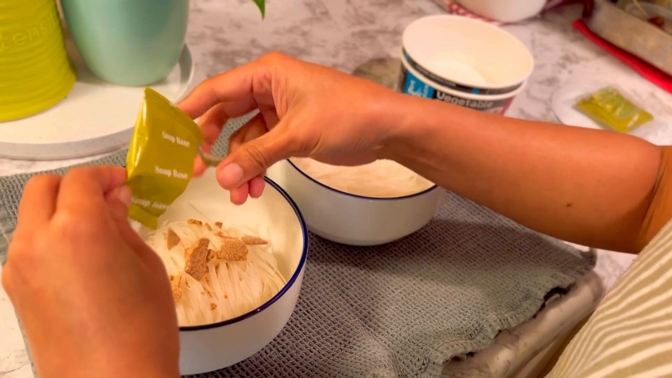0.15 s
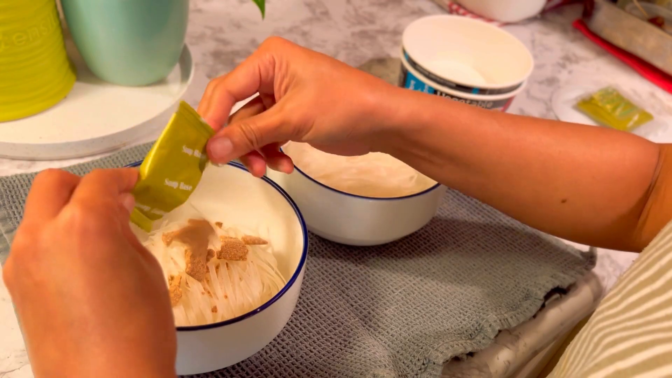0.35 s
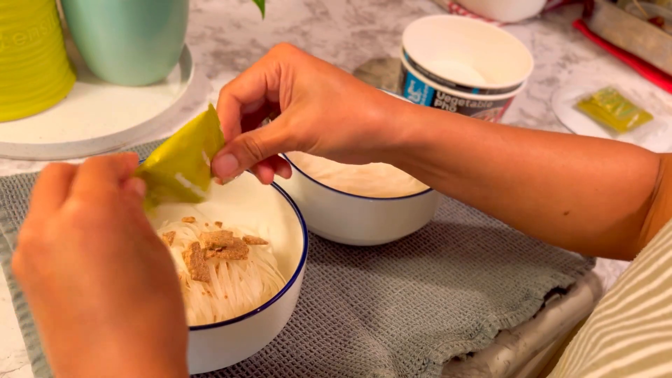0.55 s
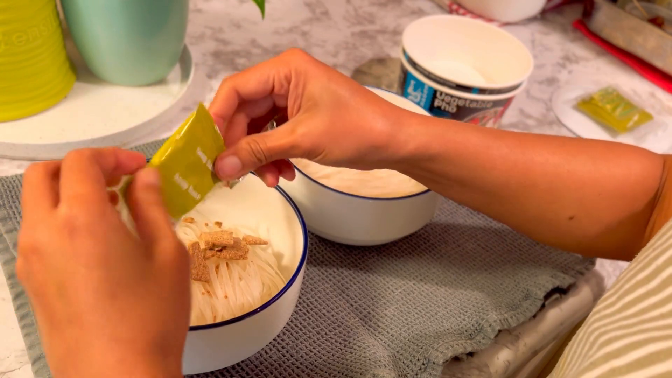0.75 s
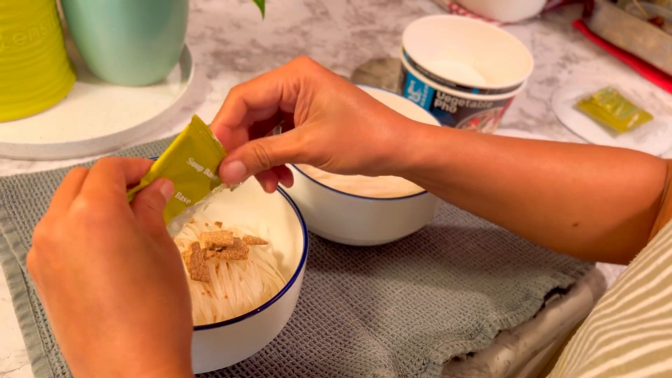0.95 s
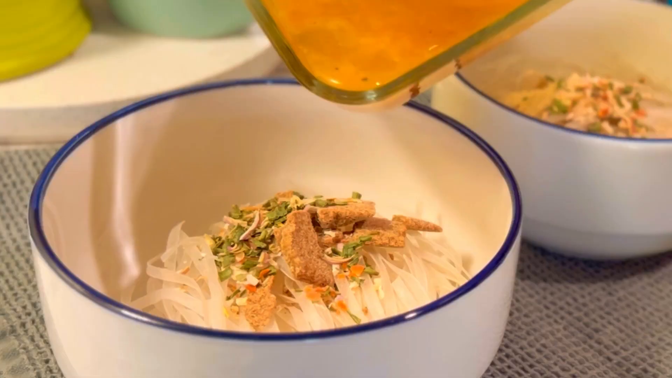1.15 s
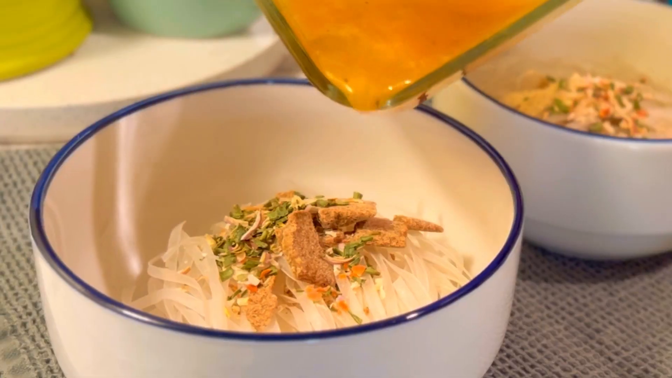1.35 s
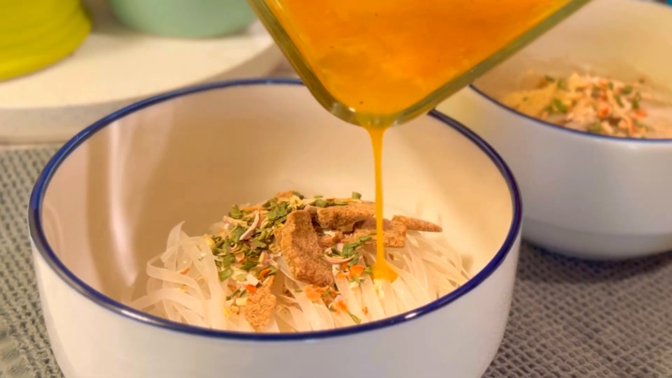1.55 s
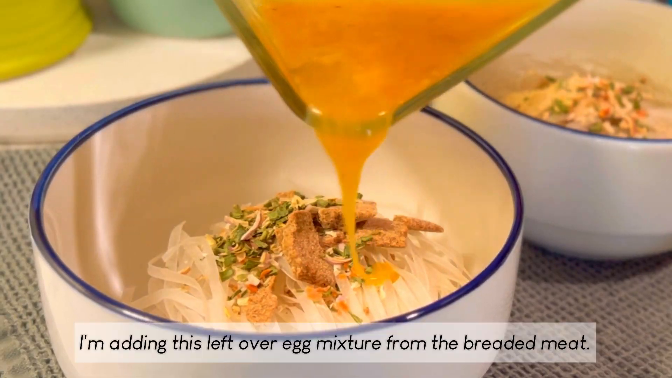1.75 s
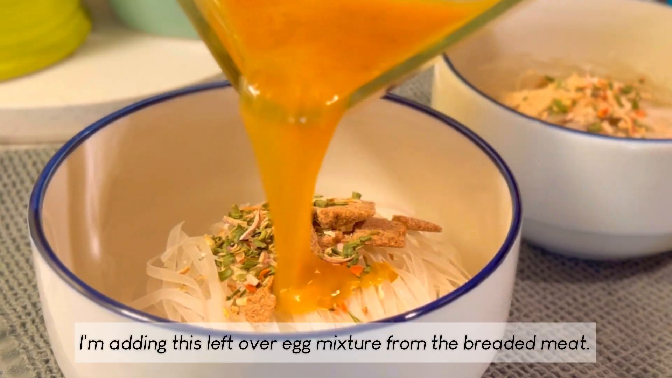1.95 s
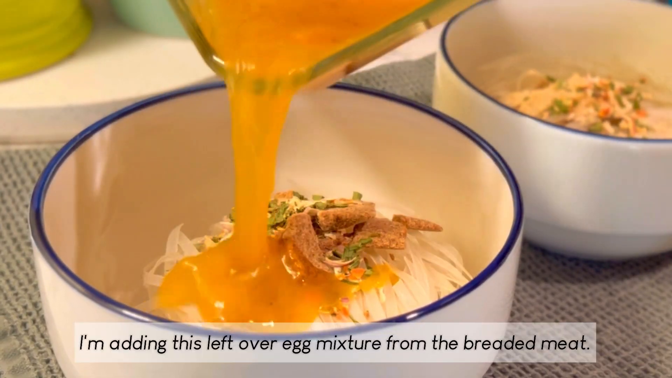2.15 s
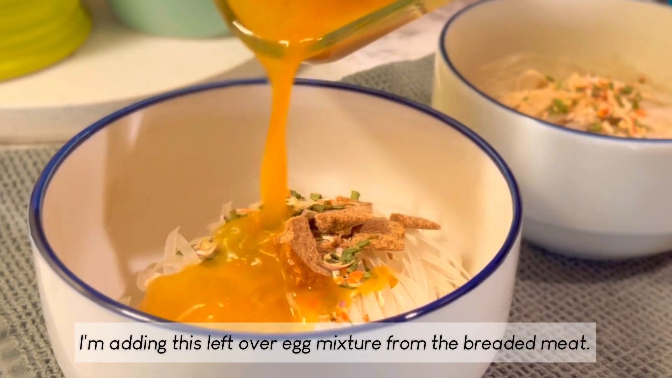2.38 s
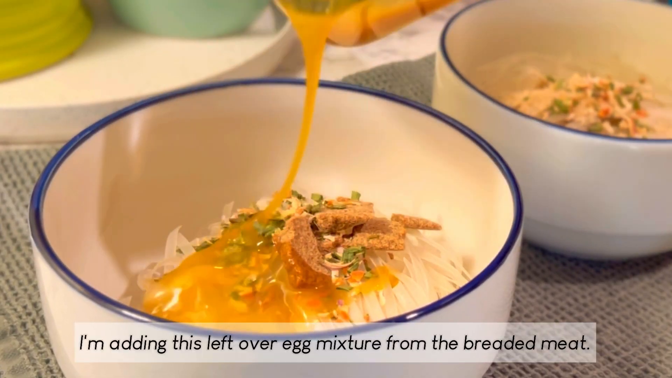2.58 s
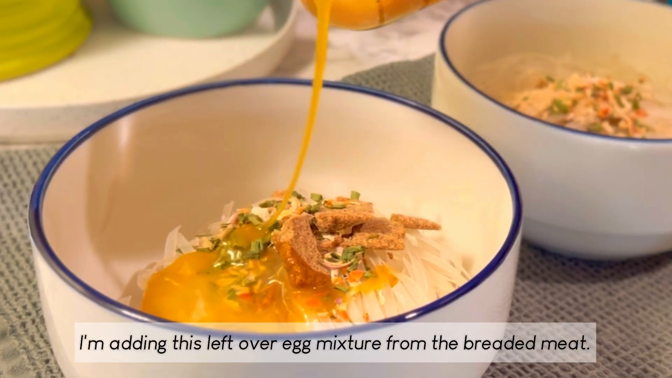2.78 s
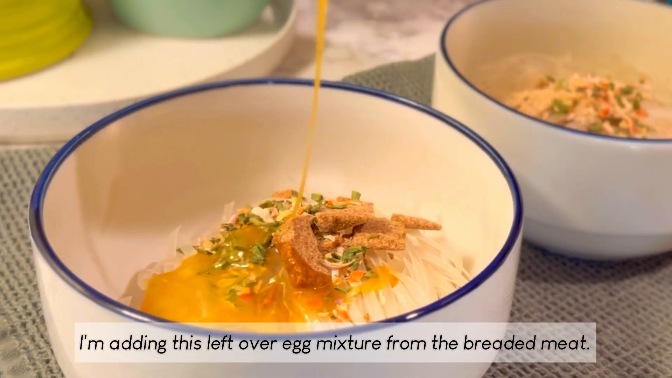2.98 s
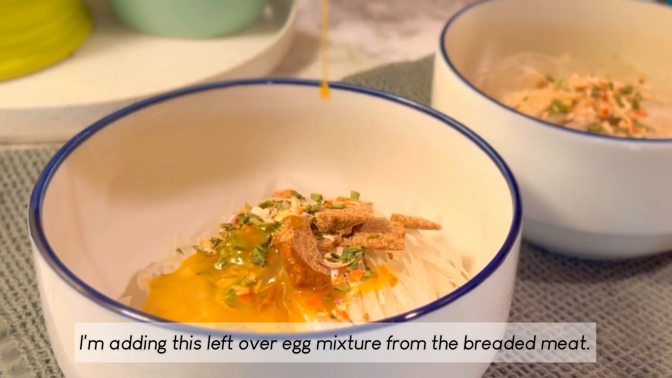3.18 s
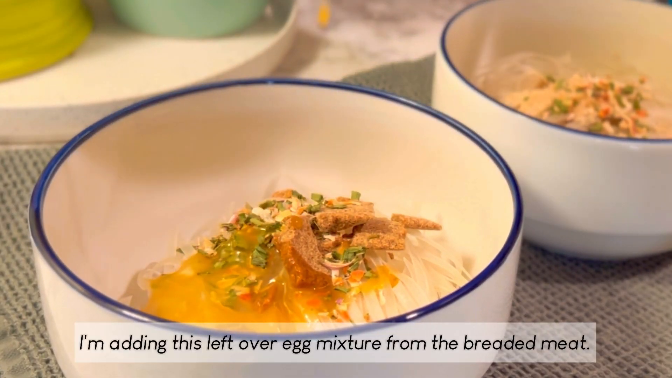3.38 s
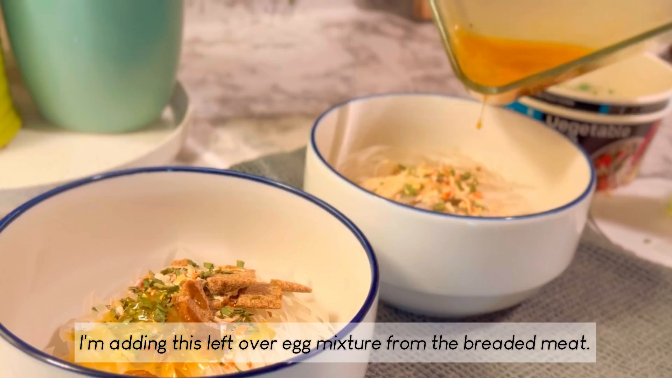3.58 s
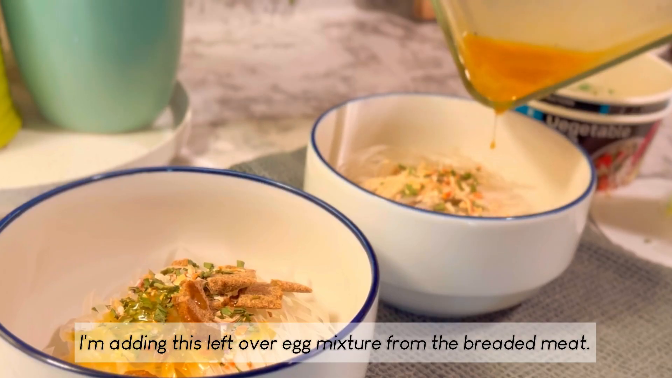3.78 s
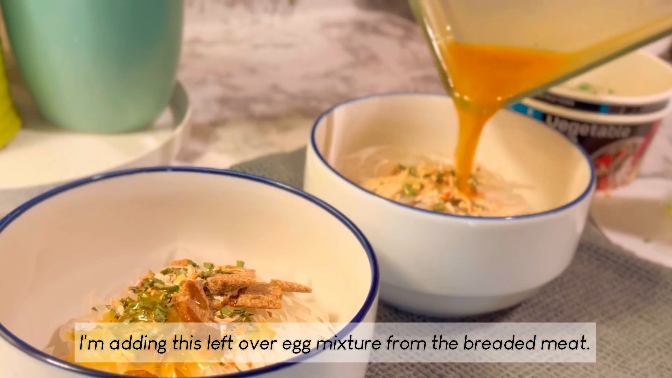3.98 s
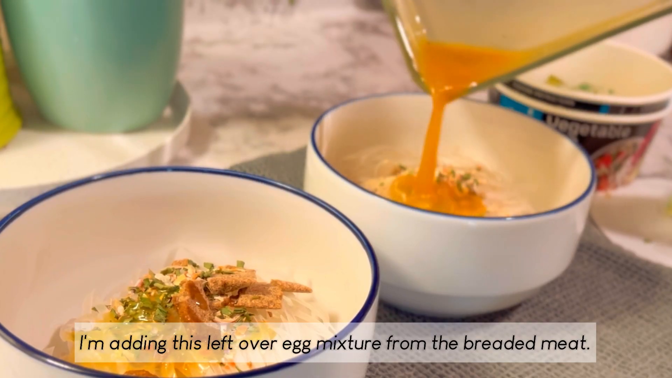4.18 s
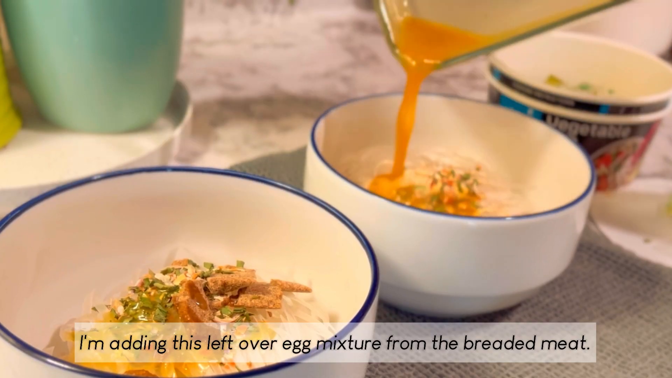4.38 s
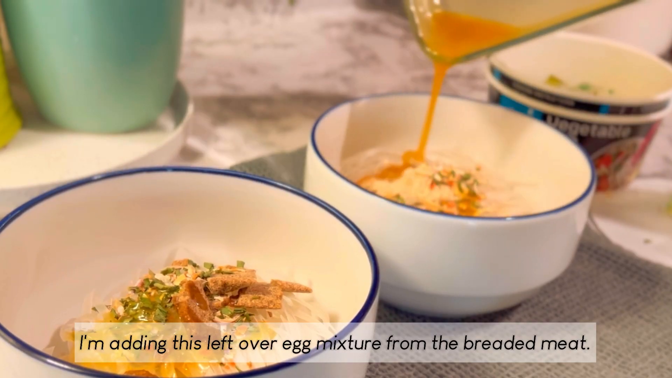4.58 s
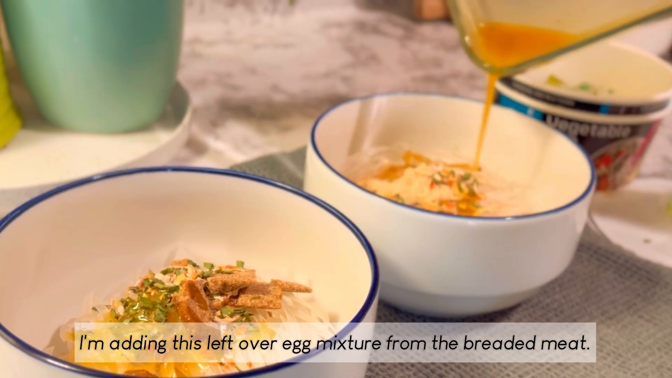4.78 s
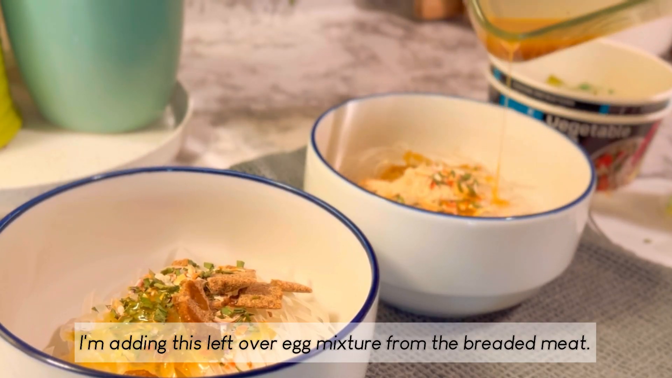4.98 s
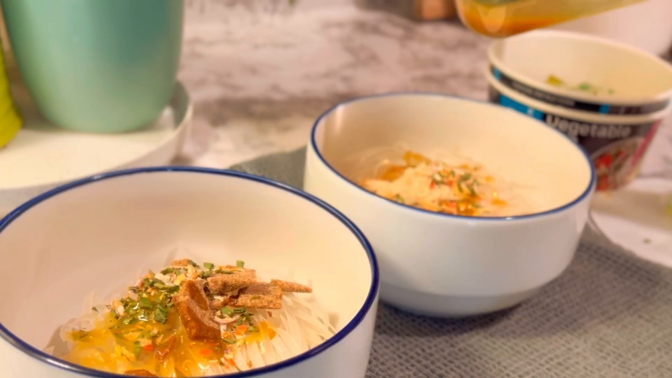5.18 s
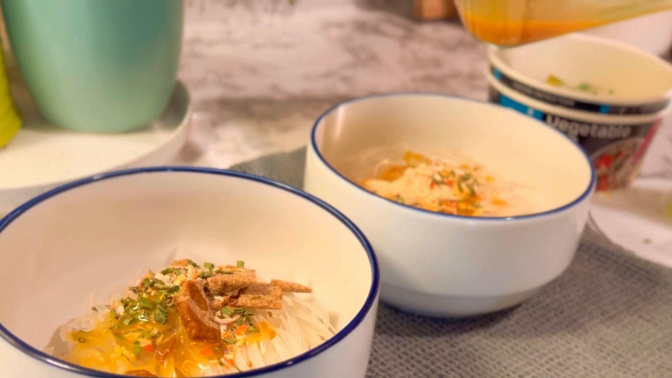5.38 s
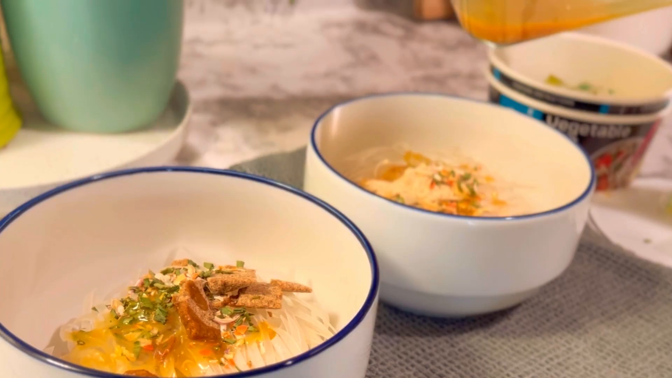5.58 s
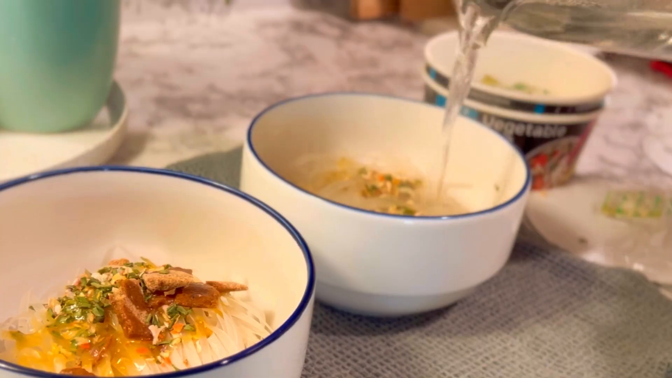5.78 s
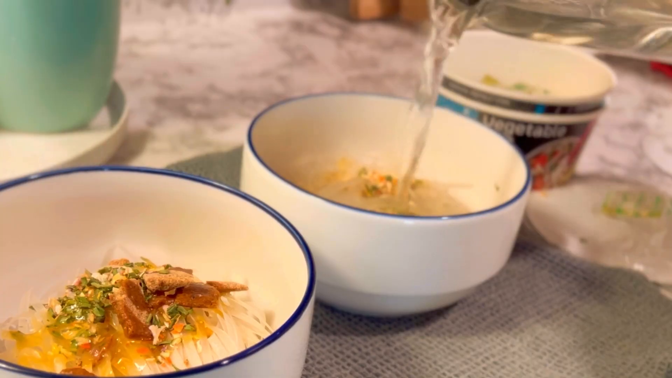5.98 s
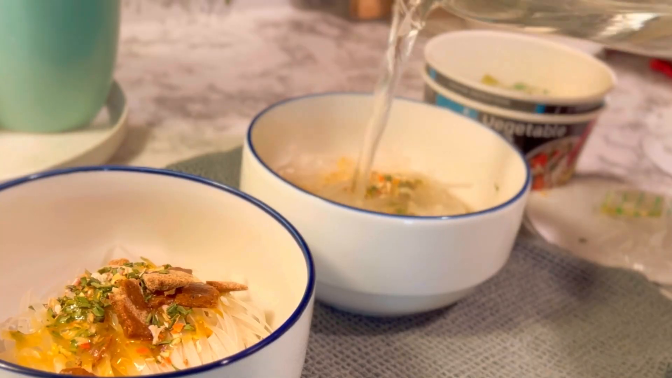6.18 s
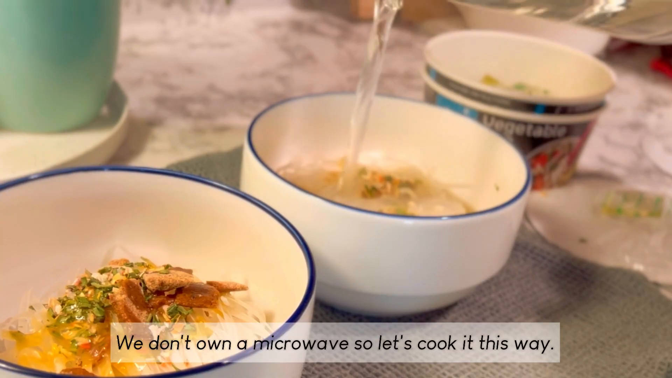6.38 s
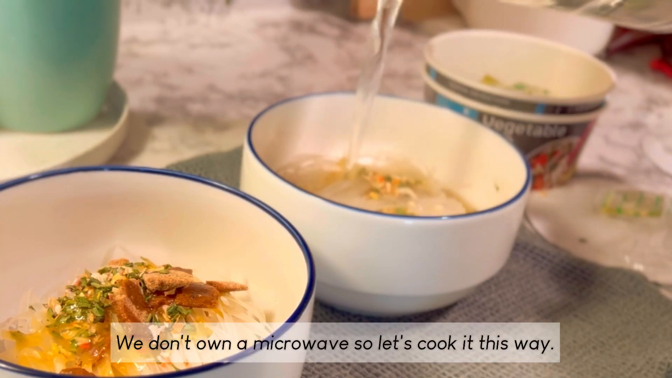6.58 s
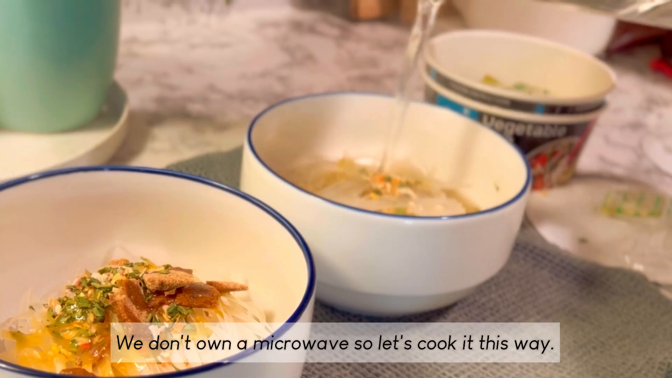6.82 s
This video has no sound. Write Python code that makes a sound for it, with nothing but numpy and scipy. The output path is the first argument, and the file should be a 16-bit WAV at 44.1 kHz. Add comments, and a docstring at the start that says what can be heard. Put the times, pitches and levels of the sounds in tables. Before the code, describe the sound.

From 0 to about 1.2 seconds a small foil sachet is squeezed close to the microphone: dry rustling grains and bright, irregular snaps, densest and loudest around 0.4 to 0.6, with more near 0.76, 0.9 to 1.0 and 1.15. Soft, quickly damped knocks accompany some of them, over the rush and low hum of an extractor fan. At 1.18 the foil is cut off abruptly and the fan becomes quieter, leaving bass rumble and faint sizzling. A dish bumps softly and dully at 2.7; fat ticks near 2.9. At 3.54 the fan and sizzle step up, with a wavering low duct tone and scattered bright spits, most frequent from 4.3 to 5.4. At 5.66 the sizzle rises again and a fluid, fluttering texture of tiny bubbling chirps and fine watery grains continues until the end at roughly 6.9. The kitchen's echo is short.

```python
"""A foil sachet crinkles from the start, in rustling grains and sharp buckles, over a humming extractor fan.
Soft knocks of hands and dishes are damped resonances; a pan sizzles as tiny bursts ring its metal, and fat spits.
The sachet is cut off at 1.18 s, where the second of four sections begins; later a dish bumps softly.
The fan's rush steps at each section; the sizzle steps too and eases twice; rumble and duct tone swell and sink.
In the last section the simmering background grows louder, with a fluid, bubbling flutter of chirps and grains."""
import sys
import numpy as np
from scipy import signal
from scipy.fft import rfft, irfft, next_fast_len
from scipy.io import wavfile
from scipy.ndimage import uniform_filter1d

SR = 44100
rng = np.random.default_rng(int(sys.argv[2]) if len(sys.argv) > 2 else 0)


def master(y):
    """Save y as 16-bit WAV."""
    cut = np.clip(np.atleast_2d(y).T, -1, 1)
    pcm = np.round(cut * 32767)  # scale
    wavfile.write(sys.argv[1], SR, pcm.astype(np.int16))


N = 302078
TIME = np.arange(N) / SR
SIZE = next_fast_len(N + SR // 2)
FREQS = np.arange(SIZE // 2 + 1) * SR / SIZE

# the four sections: start t/s, fan rush level/dB, sizzle drive level/dB, fizz drive level/dB
SECTIONS = [(0, -49.5, -60, -59.5), (1.183, -60.5, -60, -59), (3.539, -51.5, -54, -55),
            (5.663, -51.5, -49.5, -53)]
# colour of the fan's rushing air: f/Hz, relative level/dB
FAN_COLOUR = [(25, -20), (45, -11), (75, 2.5), (100, -12), (150, 4), (200, 1.5), (290, 0.5), (350, -6),
              (410, -9), (450, -0.5), (490, -9), (640, -6.5), (800, -10.5), (1100, -13), (2200, -23.5),
              (3500, -28), (5500, -22.5), (8000, -27), (16000, -35)]
# colour of the noise in the bass rumble: f/Hz, relative level/dB
RUMBLE_COLOUR = [(20, -66), (36, -22), (48, 17.5), (62, -12), (100, 13), (200, -49)]
# bass rumble that comes and goes: t/s, level/dB
RUMBLE_LEVEL = [(0.0, -87), (1.18, -60), (1.85, -55.5), (3.15, -65), (3.66, -56), (5.36, -59), (5.95, -69),
                (6.81, -68), (6.85, -73)]
# motor lines, the two near 119 Hz beating slowly: f/Hz, level/dB against the rush
MOTOR_LINES = [(99, -30), (118.3, -17.5), (119.7, -7.5), (243, -17), (286, -13.5), (888.2, -24)]
LINE_WANDER = 0.00924  # share of its pitch by which a motor line wavers
# swells and sinks of the duct tone, before its throb: t/s, level/dB
DRONE_LEVEL = [(0.0, -48), (0.13, -58), (0.17, -52), (0.82, -48.5), (0.88, -60.5), (1.14, -45.5),
               (1.22, -64), (2.82, -58), (3.51, -65.5), (3.61, -45), (3.81, -54), (4.39, -49), (4.48, -60),
               (4.5, -49), (4.77, -54), (4.94, -47), (5.0, -56.5), (5.27, -45), (5.44, -56), (5.51, -44.5),
               (5.65, -59), (5.69, -45), (5.82, -69), (5.87, -46.5), (6.14, -56.5), (6.56, -50.5),
               (6.6, -64), (6.85, -51.5)]
DRONE_HZ, THROB_DB, THROBS_PER_S = 167.9, 2.5, 18  # the throb is random

# resonances of the pan: f/Hz, width/Hz, relative level/dB
PAN_MODES = [(1461, 45, 3.5), (2148, 80, 3), (2526, 34, -2), (2800, 76, -0.5), (3333, 42, -0.5),
             (3553, 60, -3.5), (4256, 77, -2), (4650, 52, -5.5), (4917, 25, 3), (5270, 68, -0.5),
             (5610, 81, 4.5), (6325, 300, -2.5), (6860, 97, 5), (7300, 180, 0.5), (8100, 270, -1),
             (8670, 136, -1), (9220, 230, -8)]
PAN_WAVER_DB, PAN_WAVERS_PER_S = 1.5, 50
# filter for the fizz above the pan: f/Hz, gain level/dB
FIZZ_COLOUR = [(1000, -0.5), (4000, -34), (7000, -32), (9200, -9.5), (11000, 3), (13000, -15.5),
               (16000, -15)]
# the frying eases and stays lower until the next section: t/s, level change/dB
LULLS = [(2.9, -1), (5.15, -2)]
LULL_FALL_S = 0.043

# squeezes and shakes of the sachet: middle t/s, half length/s, rustle level/dB
SQUEEZES = [(0.116, 0.0045, -37), (0.262, 0.068, -43), (0.324, 0.013, -36.5), (0.452, 0.014, -33.5),
            (0.499, 0.021, -38), (0.58, 0.025, -40.5), (0.895, 0.0051, -63), (0.984, 0.035, -46.5),
            (1.116, 0.047, -49)]
HOLDING_DB = -52.5  # rustle of the sachet merely held
# colour of the rustling foil: f/Hz, relative level/dB
FOIL_COLOUR = [(250, -16), (550, 4.5), (1200, 0), (1900, 2), (4400, 5.5), (7000, 5), (10000, 0.5),
               (13000, 3), (16000, -10)]
# loud buckles: t/s, crack and tick level/dB, tick against crack level/dB, crack f/Hz, decay/ms,
# relative half width of the crack
BUCKLES = [(.0483, -40, 8, 6490, 2.1, 0.9), (.108, -38, -4, 4500, 1.2, 0.77),
           (.1485, -47, -3, 6200, .5, 0.32), (.1828, -32, -2, 5270, 0.62, 0.58),
           (.2572, -42, -5, 5500, .4, .4), (.2805, -42, -11, 7300, .4, 0.21),
           (.311, -39, -11, 6200, 2, .25), (.324, -27.5, 3.5, 6360, 4.7, 0.21),
           (.3945, -35.5, -27, 3700, 0.3, .3), (.4077, -29.5, -23, 6760, 0.21, .9),
           (.4318, -23, 9, 6850, 1.8, 0.59), (.4451, -19, -16, 4300, 0.9, 0.77),
           (.447, -41, -9, 7000, 0.7, 0.34), (.4509, -44, 2, 5660, 0.67, .6),
           (.454, -35, -12, 3680, 3, 0.31), (.4638, -20.5, 3.5, 9050, 1.6, .5),
           (.4905, -20, 19, 4300, 1.1, 0.66), (.4928, -24.5, -12, 3150, 2.9, 0.24),
           (.4983, -40, -14, 4300, .8, 0.81), (.502, -33, -16, 2900, 3.8, 0.2),
           (.5116, -37, -6, 4000, .45, 0.67), (.5208, -21, 4.5, 4640, .95, 0.1),
           (.5462, -25.5, 11, 5600, .55, 0.29), (.5874, -38, -14, 4200, 0.82, 0.45),
           (.5945, -37, -14, 4300, 0.54, 0.47), (.6304, -41, -13, 4670, .41, 0.68),
           (.6388, -38.5, -19, 3620, .7, 1.2), (.6496, -33.5, -9, 4900, 0.62, 0.91),
           (.7593, -23, 7.5, 4800, 0.24, .65), (.8855, -37.5, -19, 3570, 1.9, 0.73),
           (.889, -42, -18, 4230, 0.49, 0.46), (.8985, -45, -22, 3900, .35, .4),
           (.9113, -35, -12, 5950, 0.52, .4), (.9162, -27, 9, 4860, 1, 1.2),
           (.9203, -40, -9, 4960, .5, 0.54), (.9398, -48, -10, 5040, .5, .5),
           (.9525, -39.5, -8, 4420, 1.1, 0.8), (.9702, -39, 13, 6380, 0.41, .4),
           (.9878, -25, 7, 6600, 1.2, 0.13), (1.011, -43, -4, 4500, .4, .5),
           (1.0438, -39.5, -6, 5200, 0.93, .25), (1.0625, -41, 3, 6400, 1.4, 0.31),
           (1.0942, -40.5, 2, 4500, .96, .15), (1.1292, -26, 5, 4560, 0.74, 0.79),
           (1.1533, -21, 5.5, 5530, 1.46, 0.59)]
SNAP_RISE_SHARE = .3  # a buckle's rise, as a share of its decay
PANEL_DB, PANEL_DECAY_S = -44, 0.0048  # the panel's low ring at an average buckle
PANEL_FOLLOWS = 0.57  # power of the crack's swing that the panel follows
FACET_RING_DB, FACET_DECAY_S = 0, 0.00037  # the facet's clean ring, against its crack

# fat spitting in the pan: t/s, drive level/dB, pan ring drive against tick drive level/dB
SPITS = [(2.8968, -31.5, -3.5), (3.1025, -49, 11), (3.5399, -41, 6.5), (3.9625, -35.5, 8),
         (4.2816, -34, -4), (4.337, -31, -2), (4.4841, -33.5, 1), (4.5914, -35, 1), (4.6155, -34, 7),
         (4.869, -30, -7), (4.909, -31.5, 0.5), (5.1022, -30.5, -0.5), (5.1657, -42.5, 11.5),
         (5.3714, -29, -1), (5.4165, -33.5, 0), (6.5425, -40, 9)]
CHANCE_SPIT_DB, CHANCE_SPREAD_DB = 21, 5  # drive of further, chance spits against the fizz drive

# soft knocks of hands and dishes: t/s, drive level/dB, f/Hz, t60/s
KNOCKS = [(0.581, -29.5, 570, 0.045), (0.599, -29, 524, 0.022), (.601, -29.5, 780, 0.021),
          (.759, -23.5, 610, 0.01), (0.888, -28, 600, 0.0084), (0.911, -25.5, 1090, 0.0045),
          (1.129, -25, 516, 0.027), (1.129, -36, 1400, 0.0079), (1.155, -30, 434, 0.019)]
# modes of the bumped dish: f/Hz, relative level/dB, t60/s
DISH_MODES = [(290, 1, 0.06), (450, -17, .035), (900, -16, 0.032), (1400, -13, .035)]
BUMP_S, BUMP_DB = 2.699, -35

# colour of the dense flutter in the last section: f/Hz, relative level/dB
FLUTTER_COLOUR = [(300, -20), (700, -14), (1400, 2), (2400, -32), (3300, -2.5), (6000, 6), (12000, -13)]
FLUTTER_PATCH_DB = 2  # each half octave of the flutter swells and sinks on its own
# narrow resonances within the flutter: f/Hz, width/Hz, relative level/dB
NARROW_MODES = [(2223, 45, -5.5), (2522, 40, -3)]

# likeness of left and right for the near sounds: f/Hz, likeness (held to 0-1 in use)
NEAR_LIKENESS = [(200, -1.25), (1000, 0.66), (2500, 0.3), (4200, 0.33), (5300, 0), (7000, 0.5), (8500, 0.3),
                 (9800, 2.3), (16000, 2.5)]
# likeness of left and right for the fan and stove: f/Hz, likeness (0-1)
FAR_LIKENESS = [(50, 0.61), (150, 0.89), (300, 0.96), (450, 0.79), (1000, 0.56), (2200, 0.8), (3300, 0.14),
                (5500, 0.027), (7500, 0.14), (9500, 1), (12000, 1)]
# stereo lean of the near sounds: f/Hz, left-right level/dB
NEAR_BALANCE = [(300, -3.5), (1300, 3.5), (4500, 3), (7000, 3.5), (9500, 0)]
# stereo lean of the fan and stove: f/Hz, left-right level/dB
FAR_BALANCE = [(200, 1), (380, -3.5), (1290, 5.5), (2400, -1.5), (4400, 7), (6200, 10.5), (6900, 13),
               (8600, 0), (10000, -0.5)]
# the right microphone lags in the lows and leads in the top octave; the phase holds still in between
LOW_LAG_S, LAG_TO_HZ, HIGH_LEAD_S, LEAD_FROM_HZ = .00047, 4350, .00029, 8400
KITCHEN_T60, CUTOFF_HZ = .35, 16300  # s, Hz


def from_db(db):
    """Decibels to gain."""
    return 10 ** (np.asarray(db) / 20)


def rms_one(x):
    """Scale to unit rms."""
    return x / np.sqrt(np.mean(x ** 2) + 1e-20)


def over_hz(points):
    """Join a table by straight lines on a log-frequency axis."""
    hz, value = np.transpose(points)
    return np.interp(np.log(FREQS + 1), np.log(hz), value)


def colour(x, spectrum):
    """Filter a signal with a smooth spectrum."""
    return irfft(rfft(x, SIZE) * from_db(over_hz(spectrum)), SIZE)[..., :N]


def band(x, low_hz, high_hz):
    """Causal band-pass."""
    edges = [low_hz, min(high_hz, SR * .45)]
    return signal.sosfilt(signal.butter(2, edges, "band", fs=SR, output="sos"), x)


def resonance(x, hz, width_hz):
    """One resonance with gain 1 on top."""
    return signal.lfilter(*signal.iirpeak(hz, hz / width_hz, fs=SR), x + 1e-18)


def drift(rate):
    """A random wander through `rate` knots a second, the knots having spread 1."""
    knots = rng.standard_normal(int(N / SR * 200) + 2)
    return np.interp(TIME * rate, np.arange(len(knots)), knots)


def tone(hz, wander_hz):
    """A sine of unit rms whose pitch wanders."""
    cycles = np.cumsum(hz + wander_hz * drift(20)) / SR
    return np.sqrt(2) * np.sin(2 * np.pi * (cycles + rng.random()))


def grains(per_s, spread_db):
    """Random tiny clicks of uneven size, in two unrelated channels."""
    born = rng.random((2, N)) < per_s / SR
    size = rng.standard_normal((2, N))
    boost_db = spread_db * np.minimum(rng.exponential(1, (2, N)), 4)
    return rms_one(born * size * from_db(boost_db))


def microphones(pair, likeness, balance):
    """Two channels become left and right: partly alike, uneven in level and in arrival time."""
    common, apart = rfft(pair, SIZE)
    alike = np.clip(over_hz(likeness), 0, 1)
    sides = np.sqrt((1 + alike) / 2) * common + np.sqrt((1 - alike) / 2) * apart * [[1], [-1]]
    lean = from_db(over_hz(balance) * [[.5], [-.5]])
    sides = sides * lean / np.sqrt(np.mean(lean ** 2, axis=0))
    lag_turns = LOW_LAG_S * np.minimum(FREQS, LAG_TO_HZ)
    lead_turns = HIGH_LEAD_S * np.maximum(FREQS - LEAD_FROM_HZ, 0)
    sides[1] *= np.exp(-2j * np.pi * (lag_turns - lead_turns))
    return irfft(sides, SIZE)[:, :N]


def reflections(pair, early_db, early_t60, late_db, late_t60):
    """Quick bright echoes from close by, then the kitchen's short, duller tail."""
    t = TIME[:SR // 2]
    early, late = rng.standard_normal((2, 2, len(t))) * (t > .001)
    early = band(early, 140, 13700) * from_db(-60 * t / early_t60)
    late = band(late, 120, 3600) * from_db(-60 * t / late_t60)
    echo = from_db(early_db) * rms_one(early) + from_db(late_db) * rms_one(late)
    return pair + signal.fftconvolve(pair, echo / np.sqrt(len(t)), axes=1)[:, :N]


def fan(fan_db):
    """Rushing air as coloured noise, a bass rumble, wavering motor lines and the throbbing duct tone."""
    rush = from_db(fan_db) * rms_one(colour(rng.standard_normal((2, N)), FAN_COLOUR))
    rumble = rms_one(colour(rng.standard_normal(N), RUMBLE_COLOUR))
    rumble = rms_one(rumble + tone(49, wander_hz=3.4))
    rumble = from_db(np.interp(TIME, *np.transpose(RUMBLE_LEVEL))) * rumble
    lines = 0
    for hz, db in MOTOR_LINES:
        lines = lines + from_db(fan_db + db + 2.06 * drift(11)) * tone(hz, wander_hz=LINE_WANDER * hz)
    throb_db = THROB_DB * np.minimum(drift(THROBS_PER_S), 1)
    drone_db = np.interp(TIME, *np.transpose(DRONE_LEVEL)) + throb_db
    drone = from_db(drone_db) * tone(DRONE_HZ, wander_hz=2.37)
    return microphones(rush, FAR_LIKENESS, FAR_BALANCE) + rumble + lines + drone


def pan_ring(x):
    """The pan's resonances in parallel, each wavering in strength, keeping the power of white noise."""
    click, ring, out = signal.unit_impulse(SR // 10), 0, 0
    for k, (hz, width, db) in enumerate(PAN_MODES):
        gain = (-1) ** k * from_db(db)
        waver = from_db(PAN_WAVER_DB * drift(PAN_WAVERS_PER_S))
        ring = ring + gain * resonance(click, hz, width)
        out = out + gain * waver * resonance(x, hz, width)
    return out / np.linalg.norm(ring)


def sizzle(sizzle_db, fizz_db, per_s, spread_db, flutter_db):
    """Tiny steam bursts ring the pan and fizz above it."""
    bursts = grains(per_s, spread_db) * from_db(flutter_db * drift(60))
    return pan_ring(from_db(sizzle_db) * bursts) + colour(from_db(fizz_db) * bursts, FIZZ_COLOUR)


def squeezing():
    """Strength of the rustle: every squeeze swells and fades smoothly above that of the held sachet."""
    power = from_db(HOLDING_DB) ** 2
    for s, half_s, level_db in SQUEEZES:
        power = power + from_db(level_db) ** 2 * np.exp(-((TIME - s) / half_s) ** 2)
    return np.sqrt(power)


def rustle(effort, per_s, spread_db, creases_db, creases_per_s):
    """Countless sliding grains under the fingers, and a sparser crackle of tiny creases."""
    foil = grains(per_s, spread_db) + from_db(creases_db) * grains(creases_per_s, spread_db)
    return effort * rms_one(colour(foil, FOIL_COLOUR))


def push(t, decay_s):
    """Envelope of a buckle: a quick rise, then an exponential fall."""
    return (1 - np.exp(-t / (SNAP_RISE_SHARE * decay_s))) * np.exp(-t / decay_s)


def unit_burst(x):
    """Scale to the energy of 3 ms at unit rms."""
    return x / np.sqrt(np.sum(x ** 2, axis=-1, keepdims=True) / (.003 * SR))


def snaps():
    """In each buckle the crease ticks, the facet beside it cracks and rings, and the whole panel rings low."""
    out, t = np.zeros((2, N)), TIME[:SR // 30]
    average_db = np.mean(BUCKLES, axis=0)[1]
    for s, level_db, tick_db, hz, decay_ms, width in BUCKLES:
        at, snap_s, spread = int(s * SR), decay_ms / 1000, 1 + max(width, .05)
        crack = from_db(level_db) / np.hypot(1, from_db(tick_db))
        tick = crack * from_db(tick_db)
        panel = from_db(PANEL_DB) * (crack / from_db(average_db)) ** PANEL_FOLLOWS
        parts = [(panel, 340, 950, PANEL_DECAY_S),
                 (crack, hz / spread, hz * spread, snap_s),
                 (tick, 5800, 17000, snap_s)]
        for gain, low, high, decay_s in parts:
            noise = rng.choice([-1, 1], (2, len(t))) * push(t, decay_s)
            out[:, at:at + len(t)] += gain * unit_burst(band(noise, low, high))
        ring = unit_burst(np.sin(2 * np.pi * hz * t) * push(t, FACET_DECAY_S))
        out[0, at:at + len(t)] += crack * from_db(FACET_RING_DB) * ring
    return out


def spits(fizz_db, count, tick_db, ring_db):
    """Fat pops with a sharp bright tick, some ringing the pan more; further spits of like strength fall by chance."""
    chance = []
    for when, size in rng.random((count, 2)):
        drive_db = fizz_db[int(when * N)] + CHANCE_SPIT_DB - CHANCE_SPREAD_DB * size
        chance.append((when * N / SR, drive_db, 0))
    ticks, blows = np.zeros((2, 2, N))
    for s, drive_db, pan_db in list(SPITS) + chance:
        at, pop = int(s * SR), from_db(drive_db) * np.array([1, rng.choice([-1, 1])])
        ticks[:, at] += pop
        blows[:, at] += from_db(pan_db) * pop
    bright = from_db(tick_db) * band(ticks + 1e-18, 4600, 12000)
    pops = bright + from_db(ring_db) * pan_ring(band(blows + 1e-18, 830, 7000))
    pops[1] = np.roll(pops[1], SR // 2000)  # second channel half a millisecond late
    return reflections(pops, early_db=-6, early_t60=.06, late_db=-12, late_t60=KITCHEN_T60)


def knocks(rise_s, tap_db, tap_decay_s):
    """Each soft knock starts with a faint dull tap and swells into one quickly damped resonance."""
    out, t = np.zeros(N), TIME[:SR // 4]
    for s, level_db, hz, t60 in KNOCKS:
        at = int(s * SR)
        ring = (1 - np.exp(-t / rise_s)) * from_db(-60 * t / t60) * np.sin(2 * np.pi * hz * t)
        tap = np.exp(-t / tap_decay_s) * rms_one(band(rng.standard_normal(len(t)), 270, 2900))
        out[at:at + len(t)] += from_db(level_db) * (ring + from_db(tap_db) * tap)
    return out


def bump(rise_s):
    """A padded contact swells into the dish's few damped modes."""
    t, modes = np.maximum(TIME - BUMP_S, 0), 0
    for hz, db, t60 in DISH_MODES:
        modes = modes + from_db(np.maximum(db - 60 * t / t60, -200)) * np.sin(2 * np.pi * hz * t)
    return from_db(BUMP_DB) * (1 - np.exp(-t / rise_s)) * modes


def bubbling(level_db, count, cycles, low_hz, high_hz, spread_db, rise_per_s):
    """Small soft bubbles in the last section: damped sines, each rising a little in pitch."""
    out, t, start = np.zeros(N + SR), TIME[:SR // 25], SECTIONS[-1][0]
    for when, pitch, size in rng.random((count, 3)):
        hz = low_hz * (high_hz / low_hz) ** pitch
        at = int(start * SR + when * (N - start * SR))
        bubble = np.exp(-t * hz / cycles) * np.sin(2 * np.pi * hz * t * (1 + rise_per_s * t))
        out[at:at + len(t)] += from_db(level_db - spread_db * size) * bubble
    return out[:N]


def fluid_flutter(level_db, per_s, spread_db, surges_per_s, narrow_db, narrow_surge_db):
    """Dense fine grains shift in colour, with narrow resonances near 2.2 and 2.5 kHz surging unevenly."""
    fine = grains(per_s, spread_db)
    coloured, edges = colour(fine, FLUTTER_COLOUR), np.geomspace(400, 16000, num=11)
    flutter, narrow = 0, 0
    for low, high in zip(edges, edges[1:]):
        patch = from_db(FLUTTER_PATCH_DB * drift(surges_per_s))
        flutter = flutter + patch * band(coloured, low, high)
    for hz, width, db in NARROW_MODES:
        surge = from_db(db + narrow_surge_db * drift(surges_per_s))
        narrow = narrow + surge * rms_one(resonance(fine, hz, width))
    return from_db(level_db) * rms_one(flutter) + from_db(narrow_db) * narrow


def scene():
    """The sachet in the first section and the bubbling flutter in the last, over the kitchen background."""
    starts, *levels = np.transpose(SECTIONS)
    section = np.maximum(np.searchsorted(starts, TIME, side="right") - 1, 0)
    fan_db, sizzle_db, fizz_db = [uniform_filter1d(level[section], size=300) for level in levels]
    lull_db = 0
    for s, db in LULLS:
        same_section = section == section[int(s * SR)]
        lull_db = lull_db + db * np.clip((TIME - s) / LULL_FALL_S, 0, 1) * same_section

    foil = snaps() + rustle(squeezing(), per_s=7000, spread_db=2.0, creases_db=-2.5, creases_per_s=200)
    foil = reflections(foil, early_db=-9, early_t60=.06, late_db=-16, late_t60=KITCHEN_T60)
    sachet = foil * uniform_filter1d(1. * (section == 0), size=300)

    simmer = bubbling(level_db=-53.5, count=220, cycles=8.0, low_hz=690, high_hz=6500,
                      spread_db=21, rise_per_s=4.8)
    flutter = fluid_flutter(level_db=-59.5, per_s=5000, spread_db=2.0, surges_per_s=55,
                            narrow_db=-65.5, narrow_surge_db=4.5)
    simmer = simmer + (section == len(SECTIONS) - 1) * flutter
    simmer = reflections(simmer, early_db=-2, early_t60=.08, late_db=-11, late_t60=KITCHEN_T60)

    stove = sizzle(sizzle_db + lull_db, fizz_db + lull_db, per_s=7000, spread_db=0.0, flutter_db=1.5)
    stove = stove + spits(fizz_db, count=14, tick_db=7.5, ring_db=8)

    near = microphones(sachet + simmer, NEAR_LIKENESS, NEAR_BALANCE)
    near = near + knocks(rise_s=0.0022, tap_db=-16.0, tap_decay_s=0.013) + bump(rise_s=0.0026)
    return near + fan(fan_db) + microphones(stove, FAR_LIKENESS, FAR_BALANCE)


def record(dry):
    """A steep low-pass cuts off the very top."""
    return signal.sosfilt(signal.ellip(10, .1, 70, CUTOFF_HZ, fs=SR, output="sos"), dry)


dry = scene()
out = record(dry)
master(out)
```